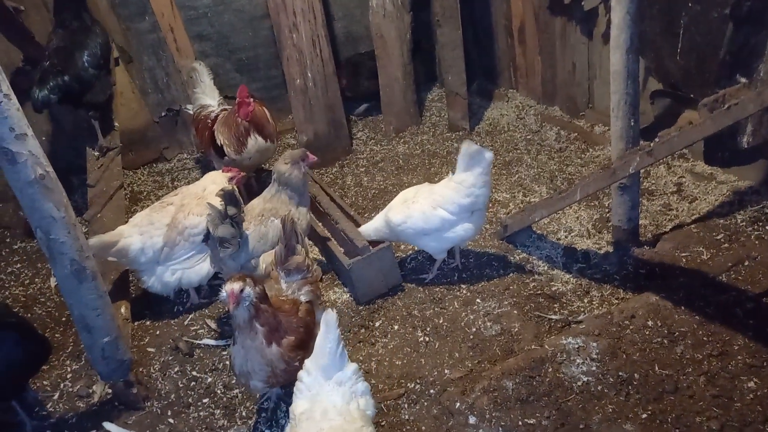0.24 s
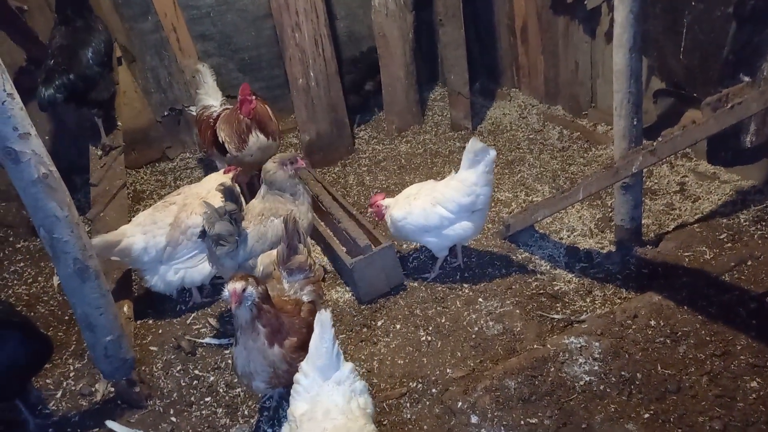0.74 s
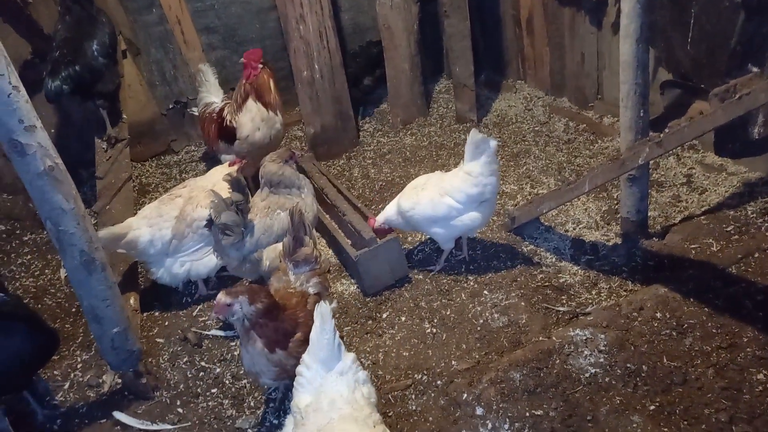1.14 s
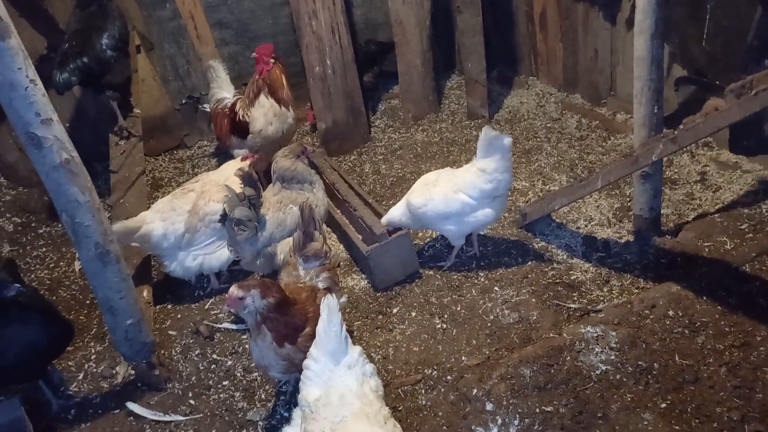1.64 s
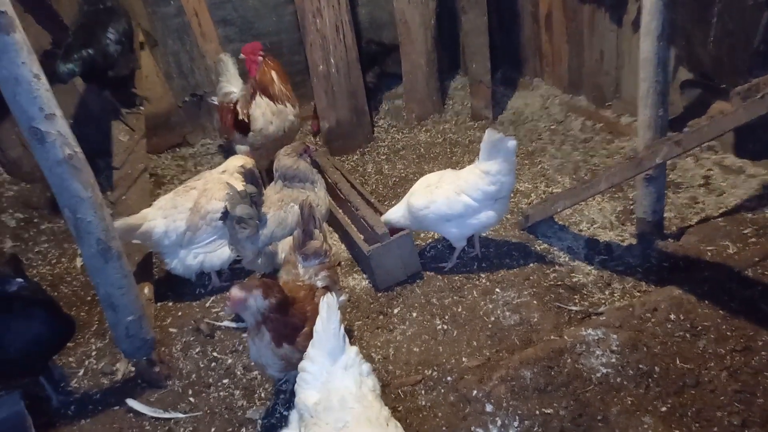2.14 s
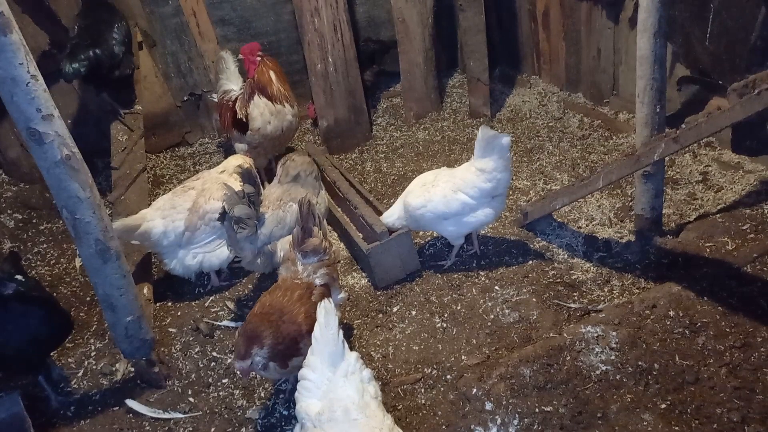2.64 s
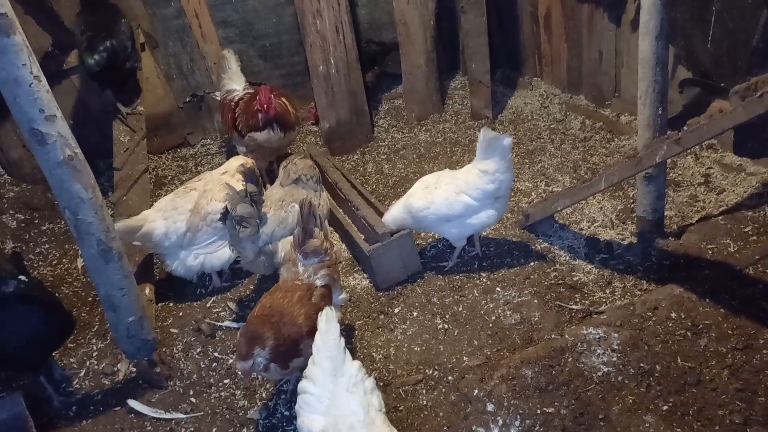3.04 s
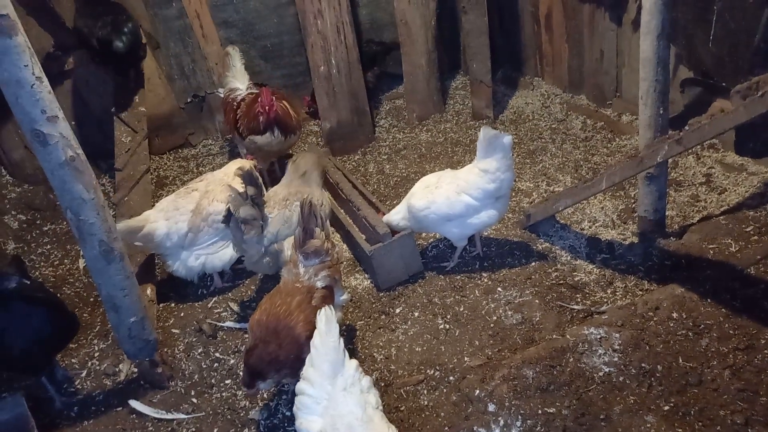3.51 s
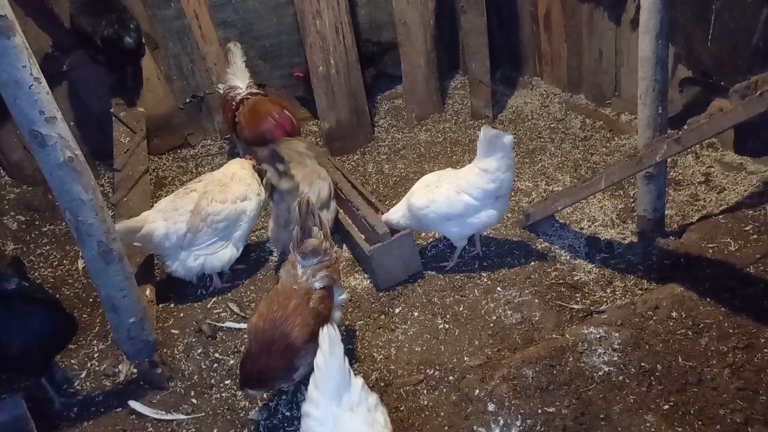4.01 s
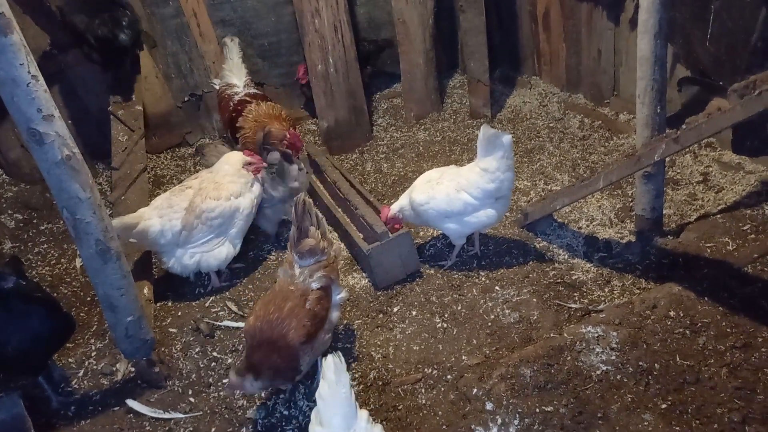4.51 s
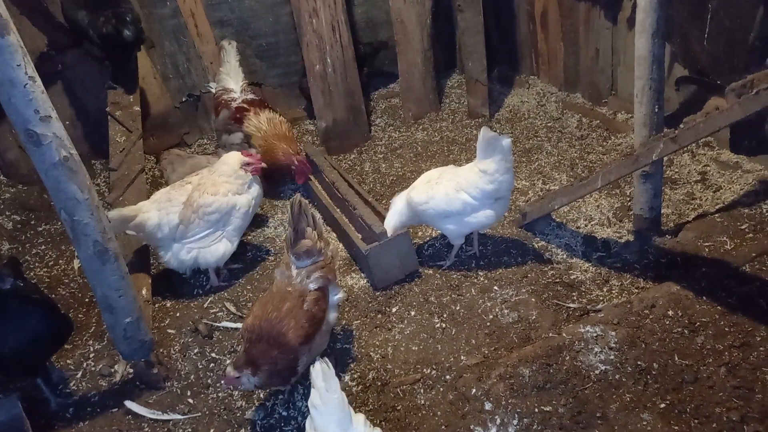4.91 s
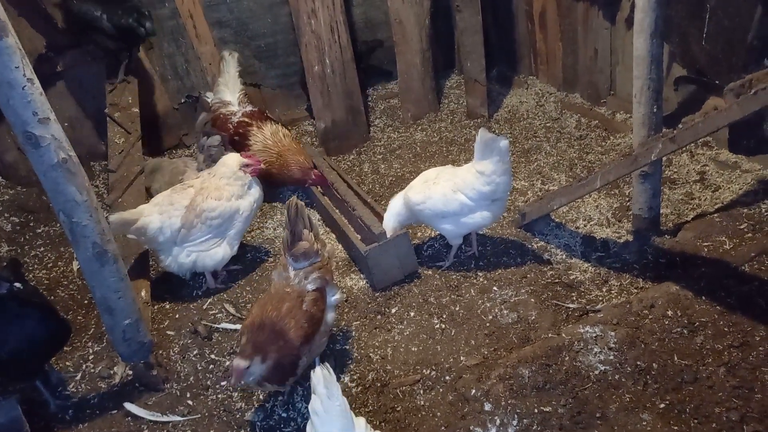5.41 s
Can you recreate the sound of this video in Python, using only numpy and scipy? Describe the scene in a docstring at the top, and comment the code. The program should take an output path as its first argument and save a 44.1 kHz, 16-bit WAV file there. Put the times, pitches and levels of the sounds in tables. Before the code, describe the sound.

Hens feed in a wooden coop, heard nearby and a little to the left. Thin, wavering whines and a rustle of feet in straw come first, then a run of short clucks and clipped boks, and finally low, drawn-out croons. Scratches, dull footfalls, hoarse puffs and a few sharp beak taps on a trough fall between the calls. Faint hiss and the hum of a distant idling motor continue underneath.

```python
"""Hens in a wooden coop

Hens, a little to the left, give thin whines, clear clucks, short boks and long croons, each a stack of
partials on a trembling pitch. Hoarse breaths and dull thuds of feet are noise bursts with a low ring.
Feet and beaks scuff the litter and tap the trough, and the boards answer the voices.
Behind it all lie rumble and hiss, and a motor idles somewhere outside."""
import sys
import numpy as np
from scipy import signal
from scipy.fft import rfft, irfft, next_fast_len
from scipy.io import wavfile
from scipy.ndimage import uniform_filter1d, map_coordinates

SR = 44100
rng = np.random.default_rng(int(sys.argv[2]) if len(sys.argv) > 2 else 0)


def wav_record(signal):
    """Record a signal, one row per channel, as 16-bit PCM in the file named by sys.argv[1]."""
    frames = np.transpose(np.atleast_2d(signal))
    bounded = np.clip(frames, -1, 1)
    # unit amplitude maps onto the largest positive 16-bit level
    quanta = np.round(bounded * 32767).astype(np.int16)
    wavfile.write(sys.argv[1], SR, quanta)


N = 249606

# cluck cues: voice, t/s, length/s, first f/Hz, last f/Hz, level/dB, swell/dB
CLUCKS = [("hoot", 1.393, 0.048, 425, 424, -29, 0), ("open", 1.495, .075, 260, 262, -31, -5),
          ("open", 1.6, 0.097, 301.5, 339, -42, 2), ("clear", 1.759, 0.045, 655, 645, -34, 2.5),
          ("clear", 1.80, 0.071, 563, 551, -22, 14), ("open", 1.96, .03, 334, 335, -34, -4),
          ("clear", 2.001, .073, 560, 544.5, -26.5, -5.5), ("clear", 2.167, 0.077, 551, 544, -20.5, 1.5),
          ("rough", 2.369, .045, 548, 492, -28.5, -1), ("rough", 2.392, 0.04, 860, 730, -31, -10),
          ("gruff", 2.805, .05, 412, 220, -32, -6), ("gruff", 2.942, 0.04, 397, 290, -29, -10),
          ("bok", 3.129, 0.04, 469.5, 490, -19.5, -7), ("bok", 3.353, .054, 464, 492, -18, -21.5),
          ("bok", 3.571, .026, 446, 425, -16, 15), ("bok", 4.023, 0.035, 437.5, 429, -16, 12.5),
          ("reedy", 4.271, .04, 484, 486, -23, 0), ("hoot", 4.743, 0.04, 490, 505, -26, -6),
          ("hoot", 5.131, 0.012, 328, 340, -14, 8), ("hoot", 5.156, .011, 320, 313, -19, 6),
          ("hoot", 5.303, .028, 479, 475, -16, 0)]
# cluck timbres by voice: octave/dB, fall per partial/dB, strain/0-1, puff/dB, puff t60/s,
# puff rasp/(dB/octave), fade/s, pitch jitter/share, shimmer/dB, breath/dB
CLUCK_VOICES = {"clear": (-3, 15, .06, -34, .3, -1, .016, .012, 3, -22),
                "open": (-1, 9, .1, -29, .08, -.6, .009, .015, 2.5, -24),
                "reedy": (-11, 2.2, .06, -22, .12, 6, .012, .018, 4, -18),
                "hoot": (-17, 15, .3, -28, .07, -5, .006, .02, 1.5, -25),
                "rough": (-5, 17, 0, -18, .08, -2, .01, .04, 2.5, -12),
                "gruff": (-4, 12, .4, -21, .09, -9, .011, .035, 3, -14),
                "bok": (-22, 15, .25, -19, .1646, -11, .014, .022, 1.5, -22)}


def amp(db):
    """dB to gain."""
    return 10 ** (np.asarray(db) / 20)


def unit(x):
    """Scaled to rms 1."""
    return x / np.sqrt(np.mean(x ** 2) + 1e-20)


def along(points, hz):
    """Read (f/Hz, value) points on a log frequency axis."""
    f, v = np.transpose(points)
    return np.interp(np.log(hz + 1), np.log(f + 1), v)


def wobble(n, rate):
    """A smooth random curve, rate knots a second."""
    return map_coordinates(rng.standard_normal(int(n * rate / SR) + 4), [np.arange(n) * rate / SR])


def filtered(x, response):
    """x through a frequency response."""
    m = next_fast_len(x.shape[-1] + 2048)
    return irfft(rfft(x, m) * response(np.fft.rfftfreq(m, 1 / SR)), m)[..., :x.shape[-1]]


def noise(n, spectrum, colour=lambda hz: 1):
    """Two unrelated coloured noises of rms 1."""
    return unit(filtered(rng.standard_normal((2, n)), lambda hz: amp(along(spectrum, hz)) * colour(hz)))


def resonance(centre_hz, tilt_db, width, lift, pivot_hz):
    """A hump of relative width on a sloping spectrum."""
    hump = lambda hz: 1 + lift / (1 + ((hz - centre_hz) / (width * centre_hz)) ** 2)
    return lambda hz: hump(hz) * amp(tilt_db * np.log2((hz + pivot_hz) / (2 * pivot_hz)))


def bursts(events, spectrum, lumps_db, lump_rate, crest_db):
    """Noise bursts that swell, die away and come in lumps."""
    out = np.zeros((2, N + SR))
    for s, db, rise, t60, colour in events:
        t = np.arange(0, np.clip(t60, .05, 1 / 3), 1 / SR)
        swell = (1 - np.exp(-t / max(rise, .0003))) ** 2 * amp(-60 * t / max(t60, .01))
        grain = unit(amp(lumps_db * wobble(len(t), lump_rate)))
        envelope = amp(db - crest_db) * swell / swell.max() * grain
        out[:, round(s * SR):][:, :len(t)] += envelope * noise(len(t), spectrum, colour)
    return out[:, :N]


def air():
    """The bed: centred rumble and wide hiss, with faint patches of rustle."""
    spectrum = [(25, -37), (92, -7), (127, -3), (195, -12), (256, -7.5), (373, -18.5), (591, -18),
                (818, -27.5), (1020, -21.5), (1260, -27), (6050, -37), (10400, -38), (14800, -31),
                (16000, -47)]  # bed colour: f/Hz, level/dB
    likeness = [(130, 0.85), (290, 0.71), (640, 0.23), (1400, .01)]  # stereo image: f/Hz, left-right likeness/0-1
    z = signal.stft(noise(N, spectrum), nperseg=512)[2]
    patches = uniform_filter1d(rng.standard_normal(z.shape[1:]), size=24, axis=0)
    patches = unit(uniform_filter1d(patches, size=8, axis=1))
    depth_db = np.geomspace(3, .6, len(patches))[:, None]  # the high hiss stays even
    pair = signal.istft(z * amp(depth_db * patches), nperseg=512)[1][:, :N]
    spread = lambda hz: np.arccos(np.clip(along(likeness, hz), -1, 1)) / 2
    mid, side = filtered(pair, lambda hz: np.array([np.cos(spread(hz)), np.sin(spread(hz))]))
    return amp(-44.5) * np.array([mid + side, mid - side])


def motor():
    """An idling motor hums on low multiples of its firing rate, each unsteady."""
    firing_rate = [(0.0, 24.54), (0.6, 24.93), (4.95, 24.88), (5.66, 25.21)]  # idle speed: t/s, f/Hz
    orders = [(3, -47), (4, -49), (5, -41.5), (6, -48)]  # hum partials: multiple, level/dB
    firing_hz = np.interp(np.arange(N) / SR, *np.transpose(firing_rate))
    phase = 2 * np.pi * np.cumsum(firing_hz * (1 + .0066 * wobble(N, 5.99))) / SR
    return sum(np.sqrt(2) * amp(db + .5 * wobble(N, 13)) * np.sin(k * phase + .8 * k * k)
               for k, db in orders)


def shuffle():
    """Feet drag through straw in one long, bright rustle."""
    drag = [(.45, -61), (0.622, -37), (.95, -42), (1.15, -50.5), (1.3, -70)]  # rustle envelope: t/s, level/dB
    db = np.interp(np.arange(N) / SR, *np.transpose(drag), left=-90, right=-90)
    return amp(db + 2.5 * wobble(N, 39.7)) * noise(N, [(1000, -27), (2500, -14), (16000, -15.5)])


def litter():
    """Claws and beaks scuff dry straw and grain; the top end is grainier and dies sooner."""
    scuffs = [(.0887, -34.5, 0.17, 4, 2030), (.2435, -23, .09, -2.5, 2330), (0.3736, -34, .12, 3, 2110),
              (.62, -25, 0.5, 3.5, 8250), (.722, -23, 0.12, 8, 2526), (.79, -22, .16, -1, 2300),
              (1.428, -40.5, .12, 8, 2100), (1.503, -38.5, .069, 8, 2530), (1.796, -38.5, 0.33, 5, 8300),
              (2.0584, -17.5, 0.074, 1, 3640), (2.076, -14.5, .15, 3, 3260), (2.2487, -36.5, 0.25, 9, 2600),
              (2.513, -34, 0.18, 0, 2230), (2.55, -35, .12, -2, 2230), (2.809, -33, .067, -4.5, 2960),
              (3.1454, -35.5, .087, 4.5, 2010), (3.3817, -41, .053, 12.5, 2060),
              (3.603, -34.5, .084, 4, 2700), (3.675, -38.5, .077, 6, 3950), (3.7394, -31.5, .065, 4, 2400),
              (3.767, -34.5, 0.11, 9, 4560), (4.397, -28.5, 0.24, -.6, 3170), (4.61, -29, 0.56, 0, 2700),
              (4.68, -14, .13, 2.5, 4960), (5.0094, -29, 0.25, -2.5, 2184), (5.457, -20.5, .2, 1.5, 2930),
              (5.6323, -31, .31, 5, 2600)]  # scuffs and pecks: t/s, level/dB, t60/s, tilt/(dB/octave), ring f/Hz
    spectrum = [(710, 6.5), (1200, -5), (1410, -2.5), (3050, -3.5), (3660, -4), (3950, -6), (7570, -6.5),
                (10900, -16), (15000, -19), (16000, -60)]  # straw colour: f/Hz, level/dB
    rise_s, split_hz = .0074, 8000
    body = [(s, db, rise_s, t60, resonance(hz, tilt_db, width=.11, lift=1.36, pivot_hz=2000))
            for s, db, t60, tilt_db, hz in scuffs]
    top = [(s, db, rise, .7 * t60, colour) for s, db, rise, t60, colour in body]
    scrape = bursts(body, spectrum, lumps_db=1.5, lump_rate=530, crest_db=6)
    crackle = bursts(top, spectrum, lumps_db=4.5, lump_rate=338, crest_db=5)
    return (filtered(scrape, lambda hz: 1 / (1 + (hz / split_hz) ** 4))
            + filtered(crackle, lambda hz: 1 / (1 + (split_hz / (hz + 1)) ** 4)))


def trough_taps():
    """A beak rings the trough briefly, with a tick on top; each side catches it differently."""
    taps = [(.092, -44, 12), (.2414, -26, -14), (.2476, -16, -14), (2.0597, -24, -3), (3.7698, -42, 11),
            (4.6853, -25, -3)]  # beak hits: t/s, level/dB, tick over ring/dB
    modes = [(1995, 0, .025), (2980, -4, .03), (3530, -5, .025), (4330, -14, .02)]  # trough modes: f/Hz, level/dB, t60/s
    out, t = np.zeros((2, N + SR)), np.arange(SR // 20) / SR
    attack = 1 - np.exp(-t / .0003)
    for s, db, tick_db in taps:
        ring = sum(amp(level + rng.normal(0, 2, (2, 1)) - 60 * t / t60)
                   * np.sin(2 * np.pi * (hz * t + rng.random((2, 1)))) for hz, level, t60 in modes)
        tick = amp(tick_db - 60 * t / .012) * np.diff(rng.standard_normal((2, len(t) + 1)))
        out[:, round(s * SR):][:, :len(t)] += amp(db - 3) * (ring + tick) * attack
    return out[:, :N]


def coop(x):
    """A short, diffuse wooden reverberation, its noise redrawn every third of a second."""
    decay = [(200, 0.15), (1000, 0.18), (8000, 0.048)]  # reverb time: f/Hz, t60/s
    out, step, predelay = np.zeros((2, N + 2 * SR)), SR // 3, 250  # samples
    for start in range(0, N, step):
        hz, t, z = signal.stft(rng.standard_normal((2, SR // 3)), SR, nperseg=256)
        tail = signal.istft(z * amp(-60 * t / along(decay, hz)[:, None]), SR, nperseg=256)[1]
        part = x[start:start + 2 * step]
        faded = part * np.hanning(2 * step)[:len(part)]
        answer = signal.fftconvolve(faded[None], tail / np.linalg.norm(tail[0]), axes=1)
        out[:, start + predelay:][:, :answer.shape[1]] += answer
    return out[:, :N]


def breaths_and_thuds():
    """Hoarse breaths and the dull thuds of scuffing feet, each with a low ring."""
    hits = [(.009, -19.5, 534, -0.1), (.12, -26, 560, -4), (.162, -21, 970, 3), (.238, -17.5, 248, 1.8),
            (.275, -21, 230, -6), (.458, -24.5, 473, -8), (.522, -22.5, 283, -1), (.661, -13.5, 490, -.6),
            (.709, -14, 250, 3), (.796, -15.5, 455, 2), (.868, -19, 443, -14), (1.324, -25, 980, 1.5),
            (1.362, -24, 430, 1), (1.398, -16, 430, -3), (2.069, -15.5, 464, -25), (2.786, -29, 298, -8),
            (3.598, -25, 461, 4.5), (3.745, -18.5, 200, -3.5), (3.809, -24.5, 242, 4),
            (3.848, -27.5, 590, 1.5), (4.069, -21, 450, -2.5), (4.475, -19, 254, 2), (4.529, -21.5, 523, 0),
            (4.612, -23.5, 1340, 10), (4.648, -14.5, 214, -14), (4.699, -14, 217, 4),
            (5.113, -13.5, 347, -17), (5.2, -15.5, 565, 3.5), (5.338, -11.5, 470, -6.5),
            (5.542, -22, 950, -5)]  # breaths and foot thuds: t/s, level/dB, ring f/Hz, tilt/(dB/octave)
    lead = {"clear": 0, "open": 0, "reedy": .01, "hoot": 0, "rough": -.009, "gruff": -.008, "bok": .025}  # puff's head start on its cluck, by voice: t/s
    spectrum = [(88, -50), (150, -6), (391, -7), (516, -7), (621, -6), (1520, -13), (2170, -15),
                (2700, -21), (6000, -43.5), (7800, -82.5), (13200, -120)]  # breath and thud colour: f/Hz, level/dB
    hit_t60_s, cues = .11, []
    for voice, s, _, hz, *_ in CLUCKS:  # each cluck has a puff at its own pitch
        db, t60, tilt_db = CLUCK_VOICES[voice][3:6]
        cues.append((s - lead[voice], db, t60, hz, tilt_db))
    cues += [(s, db, hit_t60_s, hz, tilt_db) for s, db, hz, tilt_db in hits]
    events = [(max(s - .006, 0), db, .13 * t60, t60,
               resonance(hz, tilt_db, width=.093, lift=2.34, pivot_hz=920))
              for s, db, t60, hz, tilt_db in cues]
    return bursts(events, spectrum, lumps_db=-.5, lump_rate=90, crest_db=9)[0]


def glide(start, length, first_hz, last_hz, db, swell_db):
    """Times, pitch and level of a note that slides and swells evenly."""
    u = np.linspace(0, 1, 16)
    return start + length * u, first_hz + (last_hz - first_hz) * u, db + swell_db * (u - 1 / 2)


def calls(notes, partials, jitter, shimmer_db, breath_db, fade_s):
    """A hen's voice: partials on a trembling pitch, with breath let through once a cycle."""
    breath_spectrum = [(200, -8), (700, 3), (2200, -10), (4000, -20.5), (12000, -43)]  # breath colour: f/Hz, level/dB
    out = np.zeros(N + SR)
    for note in notes:
        s, *curves = np.transpose(note)
        t = np.arange(s[0], s[-1], 1 / SR)
        hz, db, *timbre = [np.interp(t, s, curve) for curve in curves]
        phase = 2 * np.pi * np.cumsum(hz * (1 + jitter * wobble(len(t), 151))) / SR
        fade = np.sin(np.pi / 2 * np.clip(np.minimum(t - s[0], s[-1] - t) / fade_s, 0, 1))
        overtone_fade = fade ** 2.8  # overtones come late and leave early
        tone = 0
        for k, level in partials(hz, db, *timbre):
            gain = (overtone_fade if k > 1 else 1) * amp(level + shimmer_db * wobble(len(t), 40.9))
            tone += np.sqrt(2) * gain * np.cos(k * phase + .35 * (k - 1) ** 2)
        breath = amp(db + breath_db) * (1 + np.cos(phase)) * noise(len(t), breath_spectrum)[0]
        out[round(s[0] * SR):][:len(t)] += (tone + breath) * fade
    return out[:N]


def whines():
    """Thin, high notes that sway in pitch, louder at the top, with a faint octave."""
    cues = [(.02, .12, 1225, 1117, -36.5, 4), (.135, 0.17, 941, 815, -37, -1),
            (.255, .07, 1210, 1167, -36, -3), (0.443, 0.11, 1180, 1050, -39, 0),
            (.605, 0.068, 869, 845, -34, 10), (.668, .04, 1050, 1160, -37, 5),
            (.698, .11, 1165, 1140, -37, -8), (.808, .04, 1100, 1090, -38, 0),
            (.855, .092, 1130, 1130, -39, -3), (1.031, 0.29, 1146, 1136, -36, 0),
            (1.315, .05, 947, 905, -36.5, -12), (1.416, .025, 1100, 1150, -36, 0),
            (3.109, 0.03, 860, 875, -36, 0), (3.299, 0.052, 1042, 786, -33, 10),
            (3.571, .03, 2007, 2016, -38, 3), (3.8, .035, 2202, 2150, -41, 0),
            (3.811, 0.058, 1153, 1280, -41.5, 2), (5.53, .042, 945, 925, -30, 2)]  # whines: t/s, length/s, first f/Hz, last f/Hz, level/dB, swell/dB
    sway_hz, sway_depth, sway_db, octave_peak_hz = 6, .016, 1, 2300
    notes = []
    for cue in cues:
        s, hz, db = glide(*cue)
        sway = np.sin(2 * np.pi * sway_hz * (s - s[0]))
        notes.append(np.transpose([s, hz * (1 + sway_depth * sway), db + sway_db * sway]))
    partials = lambda hz, db: [(1, db), (2, db - 19 - 25 * abs(np.log2(2 * hz / octave_peak_hz)))]
    return calls(notes, partials, jitter=.01, shimmer_db=1.8, breath_db=-18, fade_s=.0096)


def croons():
    """Long, low notes shaped by the throat, duller as they get louder."""
    notes = [
        [(4.47, 252.6, -26), (4.5, 245.7, -36.5), (4.575, 259.3, -43)],
        [(4.645, 230.4, -35), (4.69, 230.1, -29), (4.75, 230.4, -29), (4.83, 240.5, -30), (4.92, 233.2, -30.5),
         (4.975, 245.4, -38)],
        [(5.065, 233.4, -30.5), (5.165, 228.1, -35.5), (5.305, 237.5, -29.5), (5.33, 230.2, -39.5),
         (5.42, 251, -27), (5.478, 262, -28)],
        [(5.54, 304, -35), (5.575, 283, -20.5), (5.61, 278, -29)],
    ]  # one contour a croon: t/s, f/Hz, level/dB
    throat = [(230, 4.5), (470, -3), (700, -2), (930, -1.5), (1170, 1.5), (1400, -10.5), (1700, -12),
              (2200, -33), (3200, -35)]  # throat response: f/Hz, level/dB

    def partials(hz, db):
        tilt_db = np.minimum(.6 * (-32 - db), 2.2)  # per octave, flat at -32 dB
        return [(k, db - 3 + along(throat, k * hz) + tilt_db * np.log2(k)) for k in range(1, 14)]
    return calls(notes, partials, jitter=.0075, shimmer_db=2.7, breath_db=-15, fade_s=.006)


def cluck_partials(hz, db, octave_db, fall_db, strain):
    """Strain alternates strong and weak cycles, adding half-order partials; a reedy edge stays on top."""
    half_db = db + 20 * np.log10(np.clip(strain, .001, 1) / 2)
    upper = [(k, db + octave_db - min(fall_db[0] * (k - 2), 30 + 1.1 * k))
             for k in range(2, 21) if k * hz[0] < SR / 3]
    return [(1, db), (1 / 2, half_db), (3 / 2, half_db - 3)] + upper


def clucks():
    """Short gliding clucks and boks; the clear ones start sharp and drop onto their pitch."""
    scoop = {"clear": .12}  # sharp onset, by voice: share of pitch
    scoop_s, out = .009, np.zeros(N)
    for voice, *cue in CLUCKS:
        s, hz, db = glide(*cue)
        hz *= 1 + scoop.get(voice, 0) * np.exp(-(s - s[0]) / scoop_s)
        note = [(*point, *CLUCK_VOICES[voice][:3]) for point in zip(s, hz, db)]
        fade_s, jitter, shimmer_db, breath_db = CLUCK_VOICES[voice][6:]
        out += calls([note], cluck_partials, jitter, shimmer_db, breath_db, fade_s)
    return out


def scene():
    """The hens reach the left side first, over the coop's answer, their foley and the bed."""
    lag = [(800, .12), (1150, .28), (1700, .2), (2400, .14)]  # right side behind left: f/Hz, delay/ms
    hens = whines() + croons() + clucks() + breaths_and_thuds()
    right = filtered(hens, lambda hz: np.exp(-2j * np.pi * hz * along(lag, hz) / 1000))
    flock = np.array([hens, right]) + amp(-11) * coop(hens)
    return flock + litter() + trough_taps() + shuffle() + motor() + air()


def record(dry):
    """The two microphone ports differ in colour; the deepest bass and the very top are cut."""
    balance = [(200, 2.5), (1200, 3.5), (2500, -2), (8000, 0.5), (13000, 2.5)]  # left port over right: f/Hz, level/dB
    low_cut_hz, top_hz = 45, 15900
    trimmed = filtered(dry, lambda hz: 1 / (1 + (low_cut_hz / (hz + 1)) ** 4))
    return filtered(trimmed, lambda hz: amp(np.outer([.5, -.5], along(balance, hz))) * (hz < top_hz))


dry = scene()
out = record(dry)
wav_record(out)
```